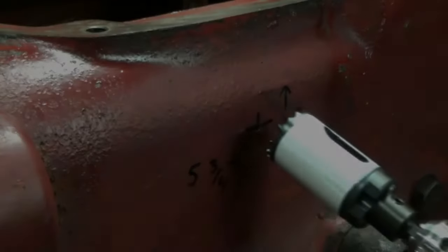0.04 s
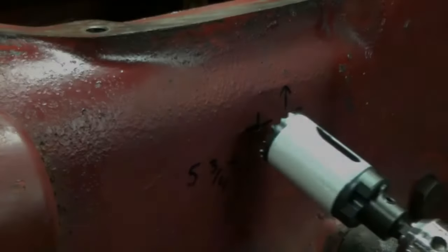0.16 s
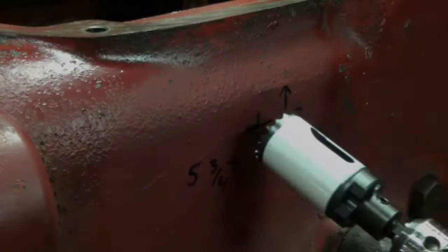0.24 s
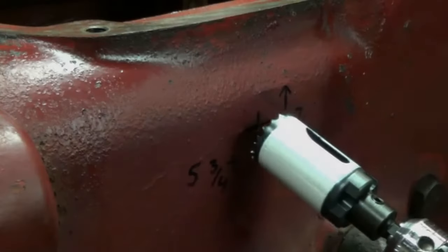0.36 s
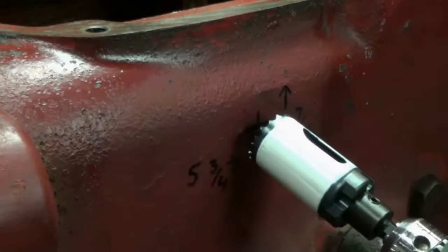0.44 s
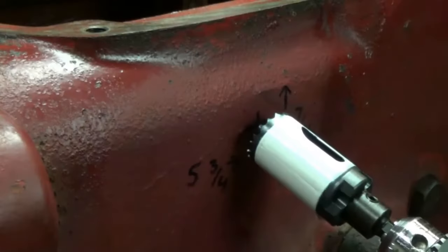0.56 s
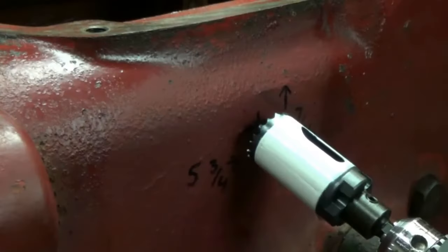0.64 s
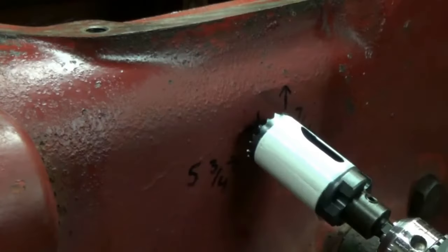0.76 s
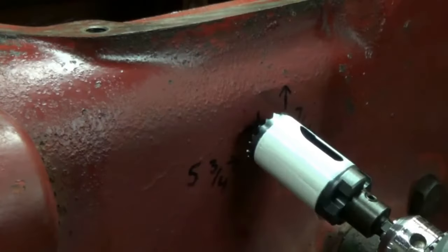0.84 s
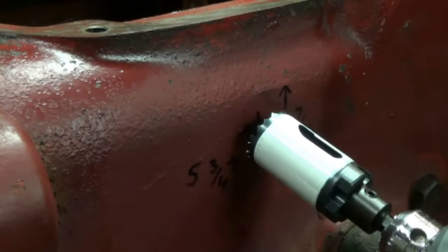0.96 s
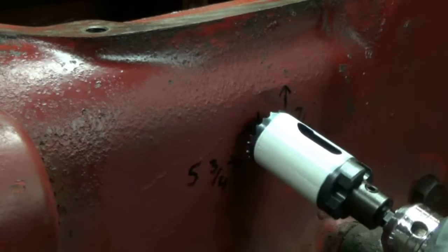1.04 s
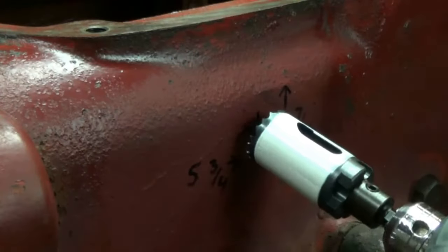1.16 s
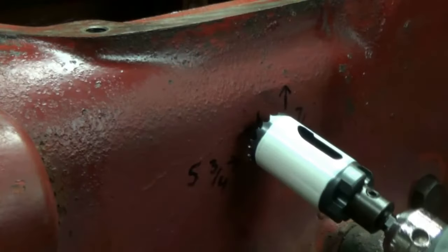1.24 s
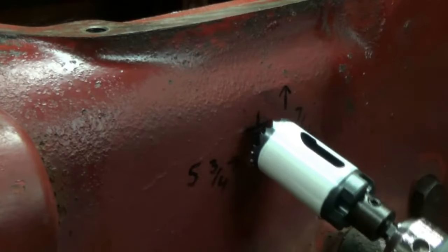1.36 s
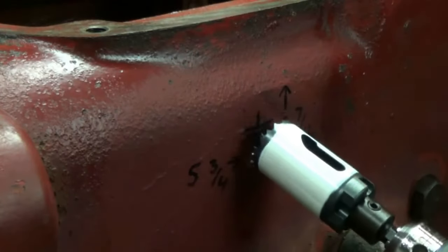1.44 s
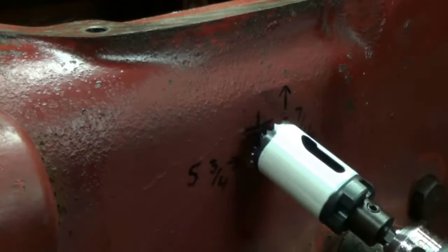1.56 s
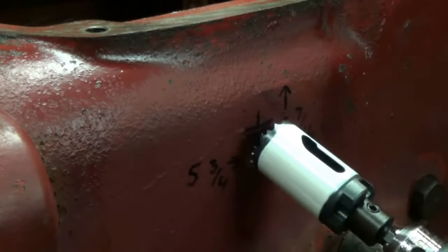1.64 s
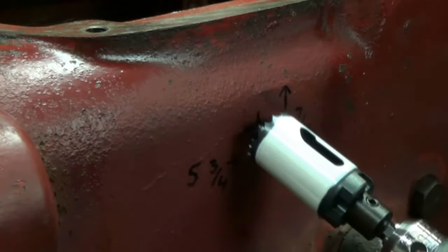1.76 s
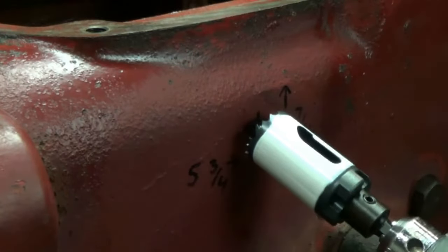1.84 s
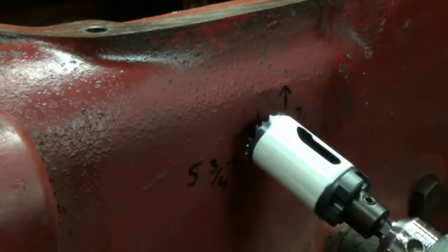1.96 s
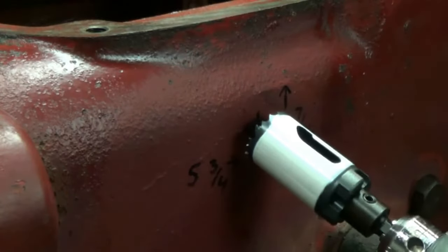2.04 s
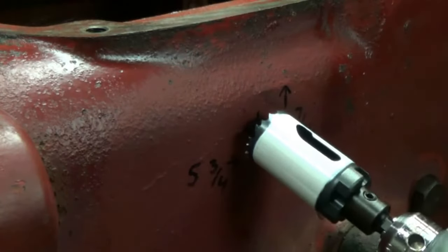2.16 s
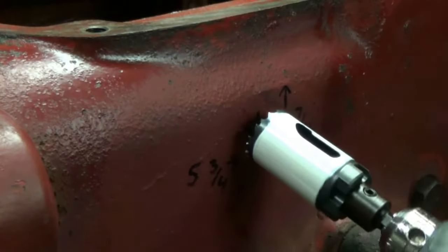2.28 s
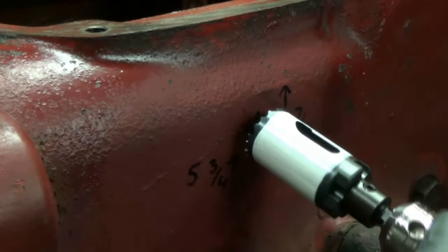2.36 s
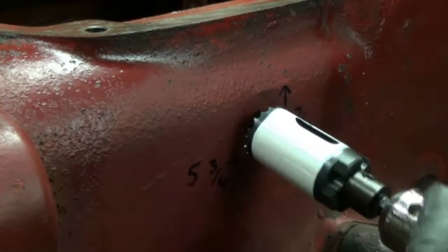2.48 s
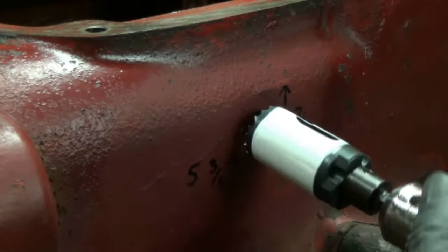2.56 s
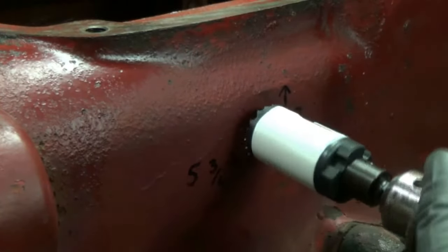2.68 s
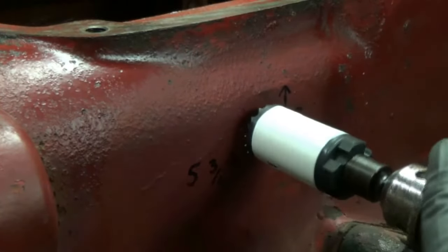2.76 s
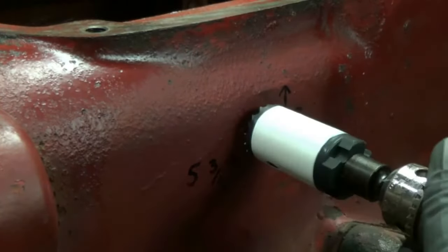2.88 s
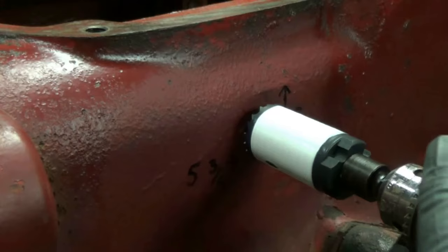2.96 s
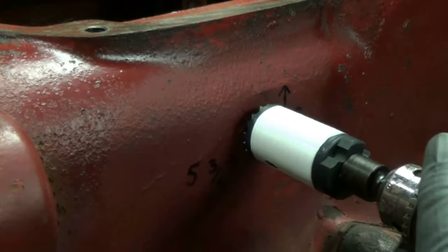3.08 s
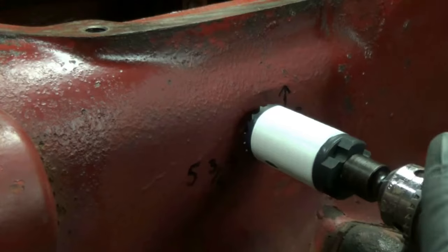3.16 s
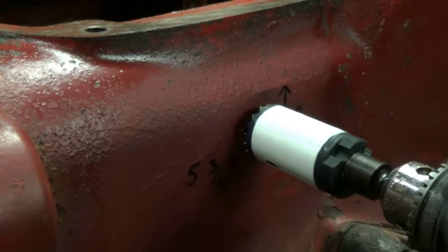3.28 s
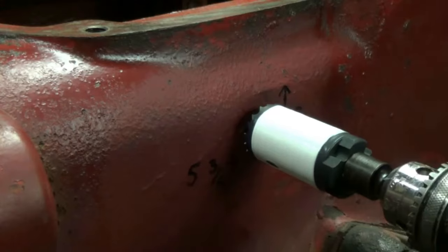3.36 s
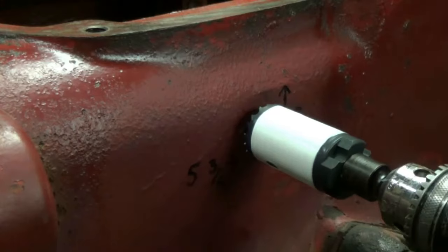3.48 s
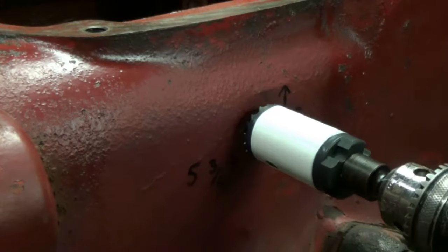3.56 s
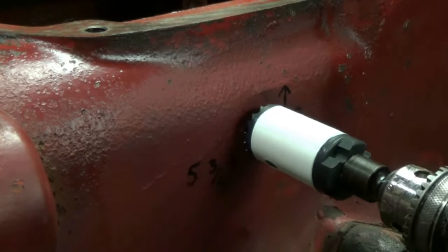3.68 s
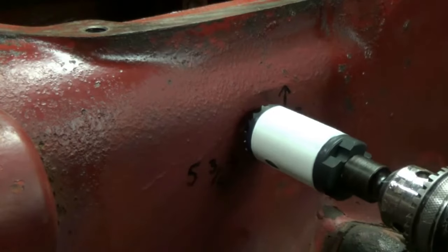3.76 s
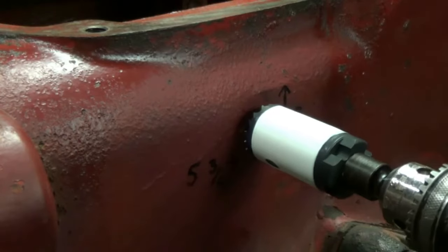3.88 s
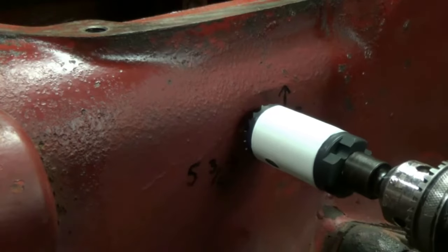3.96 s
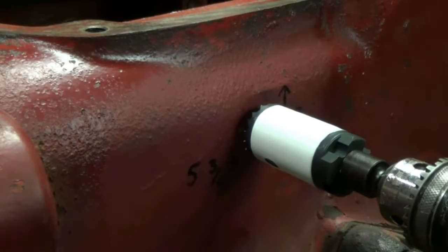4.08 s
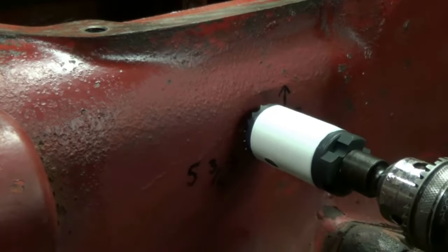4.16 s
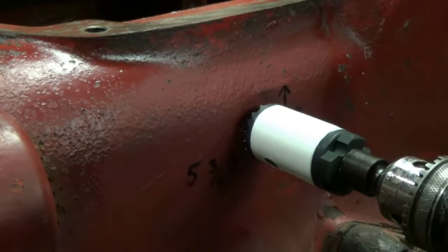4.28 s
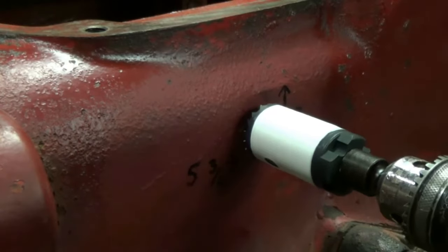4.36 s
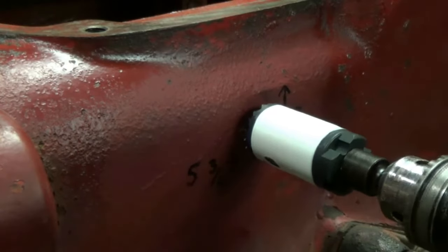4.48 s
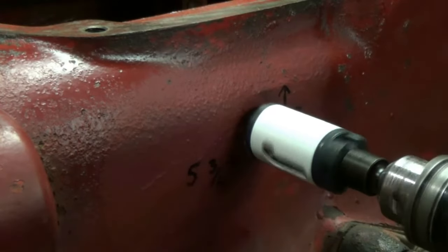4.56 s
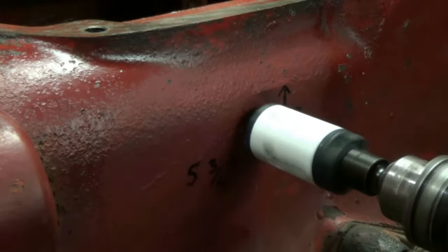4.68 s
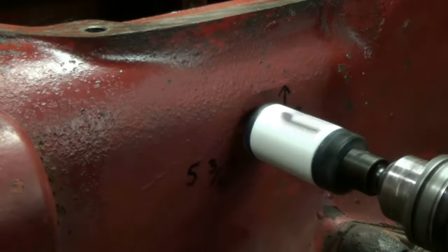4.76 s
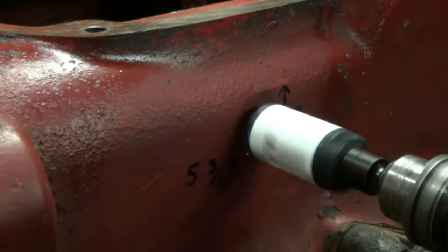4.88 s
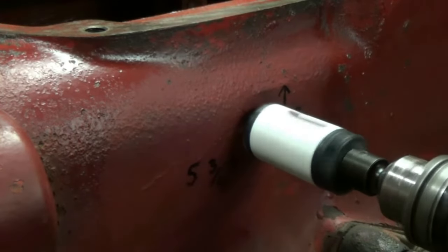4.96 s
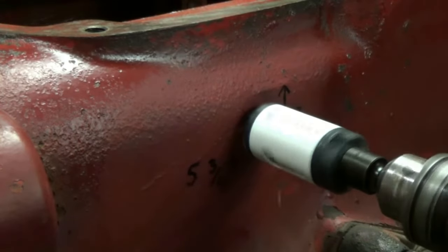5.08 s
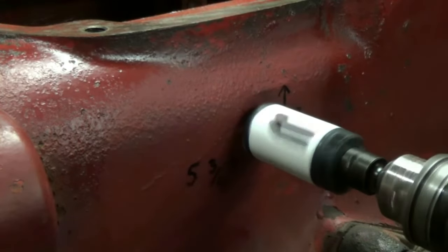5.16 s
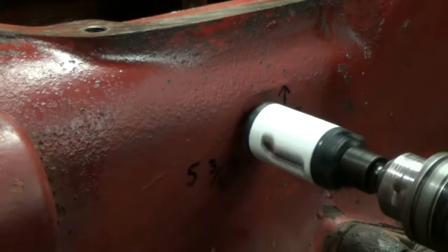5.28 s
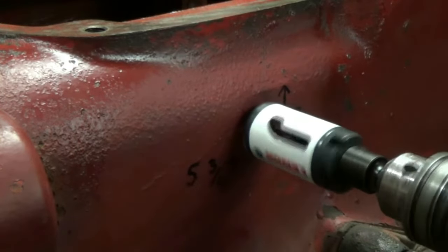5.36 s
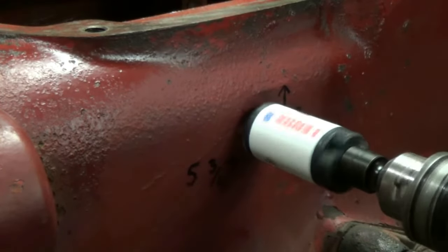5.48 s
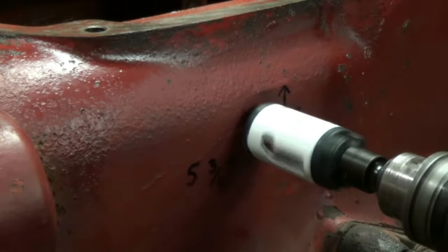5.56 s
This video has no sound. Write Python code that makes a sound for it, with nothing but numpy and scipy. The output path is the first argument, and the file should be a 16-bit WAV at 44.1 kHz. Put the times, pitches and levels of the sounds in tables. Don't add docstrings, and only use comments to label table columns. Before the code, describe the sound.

Close in a quiet workshop, a hole saw is fidgeted against a cast-iron housing: glove creaks, dry tooth rubs, a sharp knock, then chuck rattle. After four seconds the trigger clicks and the drill grinds loudly, iron ringing and steel squealing, before slowing into crackling snaps and biting again. A small camera microphone adds hiss and faint ticking.

```python
import sys
import numpy as np
from scipy import signal
from scipy.fft import rfft, irfft, next_fast_len
from scipy.io import wavfile
from scipy.ndimage import uniform_filter1d, map_coordinates

SR = 44100
rng = np.random.default_rng(int(sys.argv[2]) if len(sys.argv) > 2 else 0)


def makeup_ratio(level_db):
    decades = np.asarray(level_db, float) / 20
    return 10 ** decades


def pcm_store(signal):
    levels = np.round(np.clip(np.atleast_2d(signal), -1, 1) * 32767)
    wavfile.write(sys.argv[1], SR, levels.astype(np.int16).T)


N = 248283
T = np.arange(N) / SR


def unit(x):
    return x / np.sqrt(np.mean(x ** 2) + 1e-20)


def along(points, hz):
    f, v = np.transpose(points)
    return np.interp(np.log(hz + 1), np.log(f + 1), v)


def curves(rows):
    s, *columns = np.transpose(rows)
    return [np.interp(T, s, column) for column in columns]


def during(start, end):
    inside = 1. * (T > start) * (T <= end)
    return uniform_filter1d(inside, 221, mode="nearest")


def wobble(rate):
    return map_coordinates(rng.standard_normal(int(N * rate / SR) + 4), [T * rate])


def coloured(x, spectrum, peaks=()):
    hz = np.fft.rfftfreq(8192, 1 / SR)
    f = np.transpose(spectrum)[0]
    octaves_outside = np.abs(np.log2((hz + 1) / np.clip(hz + 1, f[0], f[-1])))
    db = along(spectrum, hz) - 30 * octaves_outside
    db = db + sum(lift / (1 + (2 * (hz - c) / w) ** 2) for c, w, lift in peaks)
    cepstrum = irfft(np.log(makeup_ratio(np.maximum(db, -120))))
    cepstrum = cepstrum * np.r_[1, 2 * np.ones(4095), 1, np.zeros(4095)]
    h = irfft(np.exp(rfft(cepstrum)))
    h = np.broadcast_to(h / np.linalg.norm(h), x.shape[:-1] + h.shape)
    return signal.fftconvolve(x, h, axes=-1)[..., :N]


def grains(rate, spread_db, alike, lean=((1, 0), (2, 0))):
    size = next_fast_len(N, True)
    pair = rfft(rng.standard_normal((2, N)) * makeup_ratio(spread_db * wobble(rate)), size)
    hz = np.fft.rfftfreq(size, 1 / SR)
    turn = np.arccos(np.clip(along(alike, hz), -1, 1)) / 2
    mid, side = pair[0] * np.cos(turn), pair[1] * np.sin(turn)
    tilt = makeup_ratio(along(lean, hz) / 2)
    left, right = (mid + side) * tilt, (mid - side) / tilt
    return unit(irfft(np.array([left, right]), size)[:, :N])


def patchy(x, depth_db, size=256):
    z = signal.stft(x, nperseg=size)[2]
    field = uniform_filter1d(rng.standard_normal(z.shape[1:]), 3, 0)
    field = uniform_filter1d(field, 4, 1)
    return signal.istft(z * makeup_ratio(depth_db * unit(field)), nperseg=size)[1][:, :N]


def bursts(s, db, t60):
    out, t = np.zeros(N + 4096), np.arange(4096) / SR
    for start, level, life in zip(s, db, t60):
        burst = makeup_ratio(-60 * t / max(life, .002)) * rng.standard_normal(len(t))
        out[round(start * SR):][:len(t)] += makeup_ratio(level) * burst / np.linalg.norm(burst)
    return out[:N]


def knocks(rows, sharp, noisy, size=2560):
    out, t = np.zeros(N + size), np.arange(size) / SR
    for s, db, hz, life in rows:
        push = noisy * makeup_ratio(-60 * t / max(life, .002)) * rng.standard_normal(len(t))
        push = push + rng.choice([-1, 1]) * (t == 0)
        band = signal.iirpeak(hz, sharp, SR)
        body = signal.lfilter(*band, signal.lfilter(*band, push))
        out[round(s * SR):][:len(t)] += makeup_ratio(db) * body / np.abs(body).max()
    return out[:N]


def knock_rows(s, db, hz, t60):
    return np.column_stack(np.broadcast_arrays(s, db, hz, t60))


# hz, level_db
HISS = [(12, -49), (20, -9), (92, 2.5), (206, -1.5), (258, -3.5), (462, -4), (1290, -8), (1800, -9),
        (2970, -12), (3230, -10), (3810, -14), (14100, -20.5), (15300, -18)]
# hz, likeness (0-1)
HISS_ALIKE = [(60, 1), (240, 0.912), (950, 0.053), (3770, 0.26), (15000, 0.99)]


def camera():
    frame_hz, scan_hz, supply_hz = 29.97, 15735, 11832
    hiss = makeup_ratio(-59) * unit(coloured(grains(3, .3, HISS_ALIKE), HISS))
    since = (T - .006) % (1 / frame_hz)
    tick = makeup_ratio(-57.5 + 1.5 * wobble(25) - 60 * since / .03) * np.sin(2 * np.pi * 3250 * since)
    gate = uniform_filter1d(1. * ((T - .015) * 13.2 % 1 < .8), 200)
    whine = makeup_ratio(-72) * gate * np.sin(2 * np.pi * scan_hz * T)
    supply = makeup_ratio(-87.5 + 3 * wobble(8)) * np.sin(2 * np.pi * supply_hz * T + 1.2 * wobble(30))
    return hiss + tick + whine + supply


# hz, level_db
THUD_COLOUR = [(200, -3), (500, -1), (900, 4), (1400, 2.5)]
TICK_COLOUR = [(5000, -3.5), (7500, -8), (11000, -5), (13000, -13), (15000, -35)]
# time_s, level_db
GRIP = [(0, -80), (.1, -66), (.4, -68), (.65, -66.5), (1.1, -76), (1.2, -70.5), (1.65, -64.5), (1.8, -70),
        (2.06, -65.5), (2.3, -68), (2.68, -63), (3.1, -64.5), (3.38, -57), (3.67, -54), (3.71, -61),
        (4.01, -61.5), (4.34, -64.5)]
# hz, level_db
GLOVE = [(88, -27), (150, -9.5), (334, 0), (708, -5.5), (954, -5.5), (1500, -14.5), (1950, -71),
         (3300, -120)]
RUB = [(650, -32), (1100, -5), (1320, -11.5), (1630, -1), (1950, -1.5), (4160, -6.5), (6500, -18.5),
       (8450, -22), (14300, -120)]
# middle_s, half_length_s, level_db, grit_db (re the stroke)
RUBS = [(0.106, 0.06, -67, -22), (0.347, 0.1, -63, -21), (0.623, 0.038, -58.5, -23),
        (0.785, 0.16, -59.5, -23), (1.156, .04, -68, -12), (1.312, 0.088, -59, -5.5),
        (1.625, 0.084, -57, -26), (1.88, .04, -51.5, -27), (2.048, 0.039, -65, -17), (2.36, 0.25, -63, -10),
        (2.712, 0.053, -63.5, 2.5), (2.831, 0.51, -62, -6), (3.152, 0.066, -70, -2),
        (3.264, 0.038, -69, 5.5), (3.369, 0.029, -60.5, 5.5), (3.458, 0.075, -51.5, -1),
        (3.646, 0.057, -43, -9.5), (3.787, 0.097, -62.5, -17), (3.952, 0.061, -57, -16),
        (4.14, 0.2, -61, -14.5), (4.335, 0.054, -81, -29)]
# start_s, end_s, level_db
DRAGS = [
    (1.238, 1.38, -57.5),
    (1.287, 1.368, -63),
    (2.64, 2.733, -59.5),
    (2.762, 2.769, -51),
    (3.622, 3.677, -49.5),
]
# hz, level_db
IRON = [(900, -22), (1400, -5), (2500, -2), (4000, -12), (6000, -17)]
# hz, width_hz, lift_db
BARE_MODES = [(1600, 75, 14), (2240, 100, 10), (3000, 350, 5), (5250, 550, 12)]


def hands():
    fade_db, rest_db, rest_grit_db = 11, -70, -81
    coarse = T[::100]
    swells = []
    for s, half, db, _ in RUBS:
        swell = makeup_ratio(db - fade_db * np.abs(coarse - s) / max(half, .01))
        swells.append(np.interp(T, coarse, swell))
    shed = makeup_ratio(rest_grit_db) + sum(makeup_ratio(row[-1]) * swell for row, swell in zip(RUBS, swells))
    near = [(300, 0.96), (10000, 0.72)]
    glove = makeup_ratio(curves(GRIP)[0] + 0.5 * wobble(14)) * unit(coloured(grains(150, 2, near), GLOVE))
    paint = unit(coloured(patchy(grains(250, 1, near), 2.5), RUB, [(2400, 900, 4)]))
    rub = (makeup_ratio(rest_db) + sum(swells)) * makeup_ratio(-1.0) * paint
    grit = shed * unit(coloured(grains(900, 1.8, near), TICK_COLOUR))
    stroke = sum(makeup_ratio(db) * during(start, end) for start, end, db in DRAGS)
    drag = stroke * unit(coloured(grains(150, 0.91, near), IRON, BARE_MODES))
    lifted = 1 - .8 * np.minimum(sum(during(start, end) for start, end, _ in DRAGS), 1)
    return (glove + lifted * rub + grit) * during(-1, 4.35) + drag


def contacts(rows, thud_db, tick_db, sharp):
    s, db, _, t60 = np.transpose(rows)
    thud = coloured(bursts(s, db + thud_db, t60), THUD_COLOUR)
    tick = coloured(bursts(s, db + tick_db, 0.72 * t60), TICK_COLOUR)
    return knocks(rows, sharp=sharp, noisy=0.25) + thud + tick


# time_s, peak_db, pitch_hz, t60_s
TAPS = [(0.5419, -37.5, 1740, 0.023), (0.5425, -55, 3080, .012), (0.5445, -48.5, 418, 0.018),
        (1.8542, -33, 5260, 0.011), (1.8563, -39, 340, 0.026), (1.8565, -30.5, 7360, 0.019),
        (1.857, -31.5, 910, 0.025), (2.5058, -38, 7100, .012), (2.5124, -35, 6000, .015),
        (1.4247, -44.5, 1870, 0.015), (1.8539, -20, 3400, 0.028), (1.8561, -23, 1760, 0.025),
        (1.9008, -35.5, 1800, 0.02), (1.901, -39, 3800, .015), (1.9088, -43, 3540, 0.042),
        (2.4966, -34.5, 1600, .014), (2.5055, -31.5, 1540, 0.012), (2.5056, -29, 3450, 0.014),
        (2.5122, -28, 2860, 0.033), (2.5135, -33, 1180, 0.015), (2.5247, -32.5, 2080, .018),
        (2.5326, -36, 1300, 0.01), (2.5372, -39, 1300, 0.013), (2.6758, -41, 1640, 0.035)]


def taps():
    return contacts(TAPS, 1, -15, sharp=1.42)


# hz, t60_s
SHOP = [(200, 0.37), (2000, 0.086), (10000, 0.14)]


def shop(x):
    hz, t, z = signal.stft(rng.standard_normal((2, SR // 2)), SR, nperseg=256)
    tail = signal.istft(z * makeup_ratio(-60 * t / along(SHOP, hz)[:, None]), SR, nperseg=256)[1]
    delayed = np.pad(x, (300, 0))[None]
    return signal.fftconvolve(delayed, tail / np.linalg.norm(tail[0]), axes=1)[:, :N]


# hz, level_db, t60_s
STEEL = [(3133, -9, .1), (3600, -18, .8), (3844, -14, 1.1), (7553, -17, .45), (8893, -9, .25),
         (10150, -14, .07), (11210, -16, .3)]


def clink():
    start_s, level_db = 1.8545, -45.5
    t = np.maximum(T - start_s, 0)
    return makeup_ratio(level_db) * sum(makeup_ratio(db - 60 * t / life) * np.sin(2 * np.pi * hz * t) for hz, db, life in STEEL)


# time_s,
# peak_db, pitch_hz
CREAKS = [(2.137, -43.5, 327), (2.658, -48, 285), (2.677, -46, 310), (3.327, -43, 689), (3.359, -45, 750),
          (3.501, -40, 850), (3.517, -50, 800), (3.533, -41, 1000), (3.549, -53, 804), (3.566, -39.5, 750),
          (3.809, -47, 705), (3.82, -33, 810), (3.822, -43, 400), (3.836, -42, 420), (3.842, -44, 1350),
          (3.832, -36.5, 815), (3.843, -37.5, 870), (3.855, -44, 408), (3.87, -40, 940), (3.946, -45, 800),
          (3.96, -45, 328), (4.003, -45, 750)]


def creaks():
    return knocks([(s, db, hz, 0.034) for s, db, hz in CREAKS], sharp=1.3, noisy=.1)


# time_s, peak_db, pitch_hz
RATTLE = [(3.353, -44, 4200), (3.4759, -41, 4500), (3.4905, -43, 5000), (3.511, -42.5, 3800),
          (3.5768, -48, 4800), (3.5817, -40, 5200), (3.586, -44, 5600), (3.605, -40, 3240),
          (3.6149, -34.5, 3080), (3.629, -36, 2920), (3.633, -36, 3050), (3.6501, -28, 3000),
          (3.655, -34.5, 1990), (3.6637, -34.5, 3160), (3.6705, -31, 3000), (3.6771, -30.5, 2290),
          (3.685, -48, 2090)]
# hz, level_db (re the knock)
CLATTER = [(6000, -8.5), (9100, -11), (11100, -15)]


def rattle():
    t60_s, low_share, low_db = 0.017, .6, -4
    main = contacts([(s, db, hz, t60_s) for s, db, hz in RATTLE], -10, -12, sharp=5)
    low = knocks([(s, db + low_db, low_share * hz, t60_s) for s, db, hz in RATTLE], sharp=4, noisy=.1)
    bright = sum(knocks([(s, db + lift, hz, t60_s) for s, db, _ in RATTLE], sharp=6.1, noisy=.15)
                 for hz, lift in CLATTER)
    return main + low + bright


def ratchet(count=6):
    start_s, gap_s, level_db, pitch_hz = 3.385, .0162, -40.5, 800
    s = start_s + gap_s * np.arange(count)
    return knocks(knock_rows(s, level_db, pitch_hz, .012), sharp=1.1, noisy=.06)


# start_s, length_s, pitch_hz, sag_hz_per_s, level_db
SQUEAKS = [
    (4.008, .022, 11650, -18000, -66),
    (4.028, .045, 12000, 19998, -67),
    (4.185, 0.035, 9550, 6000, -68),
    (4.24, 0.043, 8900, 4998, -69),
]


def squeaks():
    out = 0
    for s, length, hz, sag, db in SQUEAKS:
        t = T - s
        out = out + makeup_ratio(db) * during(s, s + length) * np.sin(2 * np.pi * (hz - sag * t / 2) * t)
    return out


# time_s, peak_db, pitch_hz, t60_s
TRIGGER = [(4.342, -28, 4400, .02), (4.3485, -38, 1310, .03), (4.3488, -29, 7500, 0.02),
           (4.4028, -35, 2300, .015), (4.48, -21.5, 910, 0.027), (4.3416, -28.5, 2560, 0.056),
           (4.3478, -23.5, 4340, 0.018), (4.349, -31, 2480, 0.034), (4.3827, -34, 1810, 0.023),
           (4.4026, -29.5, 3770, 0.01), (4.4183, -31, 2800, 0.022), (4.432, -40, 3000, .02),
           (4.4495, -34, 2230, 0.037), (4.4792, -12.5, 1720, 0.026), (4.4794, -16, 2500, 0.035),
           (4.4795, -21, 5230, 0.036), (4.4965, -28, 1090, 0.022), (4.5115, -27, 1210, 0.033)]


def trigger():
    return contacts(TRIGGER, 1, -22, sharp=1.67) * makeup_ratio([[-.8], [.8]])


def jolts():
    jolt_db, jolt_s = 9, .002
    s, db, *_ = np.transpose(CHIPS)
    kicks = np.bincount(np.round(s * SR).astype(int), makeup_ratio(db + jolt_db), N)
    return signal.lfilter([1], [1, -np.exp(-1 / (jolt_s * SR))], kicks)


FULL_HZ = 183
# time_s, speed_hz
SPEED = [
    (4.5, 30.2),
    (4.565, 101.5),
    (4.728, 167.5),
    (4.788, 182.5),
    (4.9, 182.7),
    (4.986, 164.4),
    (5.16, 139),
    (5.5, 94),
    (5.63, 63),
]
# time_s, level_db
CUT = [(4.52, -35.5), (4.533, -24), (4.55, -25.5), (4.585, -18.5), (4.61, -18.5), (4.78, -19),
       (5.14, -19.5), (5.236, -24.5), (5.45, -26), (5.5, -26.5), (5.55, -23), (5.575, -19.5), (5.63, -20)]
# time_s, share (0-1)
JERK = [
    (4.36, .5),
    (4.57, .6),
    (4.6, .35),
    (4.65, 0),
    (5.63, 0),
]
# hz, level_db
GRIND = [(420, -47), (720, -9.5), (1450, -3.5), (1620, -7), (1890, -4), (2210, -3.5), (2590, -3.5),
         (3080, -6), (3350, -6.5), (4540, -9.5), (6500, -24.5), (8450, -36), (14300, -120)]
GRIT = [(3530, -2.5), (6000, -4), (6420, -6.5), (9390, -4.5), (9860, -2.5), (11200, -1.5), (11900, -2.5),
        (13300, -10.5), (15600, -3.5)]
RUMBLE = [(35, -76), (60, -14), (112, -21.5), (315, 0.5), (504, -1.5), (600, 0.5), (780, -25), (1320, -120)]
BOOM = [(520, -22.5), (605, -4), (645, 4), (700, -5), (1000, -27)]
# hz, width_hz, lift_db
CASTING = [(950, 40, 3), (1630, 190, 6.5), (2235, 90, 3), (2790, 60, 2), (3130, 40, 4), (3835, 70, 3),
           (7560, 30, 4), (8510, 25, 5), (8890, 36, 4)]
SINGING = [(1612, 55, 25), (3130, 26, 22), (7560, 25, 18), (8510, 16, 26)]
# hz, likeness (0-1); then hz, left_minus_right_db
ALIKE = [(60, 0.37), (180, 0.9), (550, 0.86), (1650, 0.77), (4970, 0.67), (15000, 1)]
LEAN = [(60, 3), (180, -2.5), (550, -2.5), (1650, -2.5), (4970, -4.5), (15000, 1)]


def drill():
    creep_s, catch_s, spun_s, mains_hz = 4.355, 4.482, 4.58, 60
    slow = 1 - np.minimum(curves(SPEED)[0] / FULL_HZ, 1)
    kick = np.exp(-2.5 * ((T - 4.5277) * mains_hz % 1))
    force = makeup_ratio(-47.5) * during(creep_s, catch_s) + makeup_ratio(curves(CUT)[0]) * during(catch_s, 6)
    torque = 1 + curves(JERK)[0] * (unit(kick) - 1) + jolts()
    grind = unit(coloured(patchy(grains(2400, 2.6, ALIKE, LEAN), 1.6, size=1024), GRIND, CASTING))
    grit_db = -4 - 12 * slow + 0.34 * wobble(45)
    grit = unit(coloured(grains(1400, 0.94, ALIKE, LEAN), GRIT, CASTING)) * makeup_ratio(grit_db)
    strain = np.clip((spun_s - T) / (spun_s - CUT[0][0]), 0, 1)
    coasting = during(5.13, 5.5)
    rumble_db = -15.5 - 7 * slow + 11 * strain - 6 * coasting
    rumble = unit(coloured(grains(60, 1.4, ALIKE, LEAN), RUMBLE)) * makeup_ratio(rumble_db)
    boom_db = -17.5 + 6 * slow + 3 * (T < catch_s)
    boom = unit(coloured(grains(40, .5, ALIKE, LEAN), BOOM)) * makeup_ratio(boom_db)
    thin = [(500, -6.0), (3000, -1.0), (9000, -24.0)]
    sing = unit(coloured(grains(30, 0.62, ALIKE, LEAN), thin, SINGING)) * makeup_ratio(-13.5)
    return force * (torque * (grind + grit) + boom + rumble + sing)


# start_s, end_s, pitch_hz, level_db
HOWLS = [(4.362, 4.373, 600, -52), (4.379, 4.393, 600, -49), (4.414, 4.425, 620, -54),
         (4.446, 4.458, 620, -53), (4.592, 4.65, 650, -31), (4.695, 4.725, 620, -33),
         (4.695, 4.78, 1620, -24), (4.78, 4.87, 1670, -29.5), (4.88, 4.98, 1580, -31),
         (4.86, 4.94, 2260, -33), (5.05, 5.11, 2200, -32), (5.2, 5.55, 640, -44), (5.33, 5.42, 1630, -36),
         (5.44, 5.5, 1640, -37), (5.45, 5.505, 225, -50), (5.555, 5.605, 200, -51), (5.565, 5.6, 340, -47),
         (5.6, 5.636, 440, -46), (4.793, 4.815, 2200, -25), (4.83, 4.865, 3130, -31),
         (4.985, 5.015, 3130, -29), (5.09, 5.125, 1610, -28), (5.148, 5.175, 2235, -26),
         (5.175, 5.2, 1630, -29), (5.568, 5.6, 640, -29), (5.568, 5.59, 760, -32),
         (5.568, 5.636, 1570, -24)]


def howls():
    flutter, drift = makeup_ratio(1.5 * wobble(70)), wobble(90)
    ring = 0
    for start, end, hz, db in HOWLS:
        phase = 2 * np.pi * hz * T + min(hz / 900, 1.8) * np.roll(drift, hz)
        ring = ring + makeup_ratio(db) * np.roll(flutter, hz) * during(start, end) * np.sin(phase)
    return np.sqrt(2) * ring * makeup_ratio([[-1.2], [1.2]])


# time_s, peak_db, pitch_hz, t60_s
BITES = [
    (4.5279, -21, 910, 0.028),
    (4.5445, -20, 950, .03),
    (4.5605, -15.5, 940, 0.033),
    (4.5778, -21, 1550, .02),
    (4.5438, -14, 2050, 0.02),
    (4.5603, -19, 2220, 0.021),
    (5.5277, -14.5, 1880, 0.026),
    (5.5457, -14, 2770, 0.041),
    (5.5651, -19, 2420, .03),
    (5.578, -19, 1480, 0.049),
]


def bites():
    return knocks(BITES, sharp=1.9, noisy=0.27)


def armature():
    first_db, second_db, third_db = -47.5, -41, -49
    first_fall_db, second_fall_db = 46, 52
    hz, = curves(SPEED)
    slow, turn = 1 - hz / FULL_HZ, 2 * np.pi * np.cumsum(hz) / SR
    first = makeup_ratio(first_db - first_fall_db * slow) * np.sin(turn)
    second = makeup_ratio(second_db - second_fall_db * slow + 0.99 * wobble(12)) * np.sin(2 * turn + 1.4 * wobble(25))
    third = makeup_ratio(third_db - second_fall_db * slow) * np.sin(3 * turn + wobble(25))
    return np.sqrt(2) * (first + second + third) * during(4.565, 5.15) * makeup_ratio([[-1.5], [1.5]])


# start_s, end_s, mode_hz, level_db
SQUEAL = [(4.631, 4.66, 10200, -25), (4.62, 4.652, 11300, -25), (4.67, 4.7, 11215, -28),
          (4.885, 4.907, 10160, -29), (4.887, 4.91, 11300, -24.5), (4.971, 4.988, 10145, -26),
          (5.013, 5.036, 11240, -22), (5.05, 5.104, 11100, -30), (5.058, 5.098, 7546, -35),
          (5.1, 5.128, 11260, -30), (5.137, 5.152, 10145, -26), (5.155, 5.198, 10145, -24.5),
          (5.222, 5.227, 11215, -26), (5.243, 5.296, 10930, -30), (5.247, 5.258, 11215, -33),
          (5.273, 5.298, 11250, -28), (5.243, 5.256, 10145, -26), (5.272, 5.297, 10145, -26),
          (5.32, 5.348, 11470, -32), (5.394, 5.423, 11300, -39), (5.425, 5.487, 7558, -48)]


def squeal():
    cup_hz = np.array([7558, 10145, 11062, 11215])
    drift, ring = 1.2 * wobble(60), 0
    for start, end, hz, db in SQUEAL:
        mode = cup_hz[np.abs(cup_hz - hz).argmin()]
        ring = ring + makeup_ratio(db) * during(start, end) * np.sin(2 * np.pi * mode * T + drift)
    whine = sum(makeup_ratio(-43 + 4 * wobble(45)) * np.sin(2 * np.pi * hz * T + 1.5 * wobble(40)) for hz in cup_hz[1:])
    flutter = makeup_ratio(3 * wobble(220))
    return flutter * ring + whine * during(4.6, 5.44)


# time_s, knock_db, high_snap_db, low_snap_db
CHIPS = [(5.0558, -14, -17, -22), (5.1266, -10, -14, -18), (5.1486, -14, -17, -22), (5.1555, -11, -14, -19),
         (5.1743, -14.5, -14, -20), (5.1989, -13, -13, -14), (5.2068, -16, -10, -16),
         (5.2137, -16, -12, -14), (5.2185, -15, -12, -13), (5.2274, -14, -11, -17), (5.2365, -16, -10, -16),
         (5.2422, -16, -12, -21), (5.2586, -15, -11, -22), (5.2693, -14, -10, -21), (5.297, -14, -11, -19),
         (5.3003, -13, -16, -19), (5.3154, -11.5, -16, -21), (5.3422, -12, -13, -21),
         (5.3549, -13, -11, -18), (5.3741, -12.5, -12, -18), (5.3949, -12, -11, -17),
         (5.403, -14, -13, -14), (5.4203, -12, -11, -13), (5.4431, -9.5, -16, -19),
         (5.4555, -13.5, -30, -32), (5.4835, -17, -27, -27)]
# hz, level_db, t60_s
PINGS = [(7553, -9, .4), (8510, -7, .3), (10145, 3, .08), (11215, -2, .1)]


def chips():
    s, db, high_db, low_db = np.transpose(CHIPS)
    levels = np.array([high_db, low_db, high_db - 11]) - 3.5 + .7 * rng.standard_normal(len(s))
    snap = sum(knocks(knock_rows(s, level, hz, .005), sharp=8, noisy=.6)
               for hz, level in zip((10800, 8400, 13200), levels))
    knock = knocks(knock_rows(s, db - 3.5, 3600, .009), sharp=1.3, noisy=.2)
    ring = knocks(knock_rows(s + .002, db - 21, 645, .06), sharp=4, noisy=.1)
    t = np.arange(SR // 2) / SR
    ping = sum(makeup_ratio(level - 60 * t / life) * np.sin(2 * np.pi * hz * t) for hz, level, life in PINGS)
    blows = np.bincount(np.round(s * SR).astype(int), makeup_ratio(low_db - 27), N)
    ping = signal.fftconvolve(blows, ping)[:N]
    return snap + ping + (knock + ring) * makeup_ratio([[-1.3], [1.3]])


def bench():
    bump = knocks([(5.14, -42, 85, -1.5)], sharp=3.1, noisy=0.062, size=8192)
    return np.array([bump, np.roll(bump, 120)])


def scene():
    hits = (taps() + rattle() + trigger() + clink()) * makeup_ratio([[-1.8], [1.8]])
    hits = hits + (creaks() + ratchet()) * makeup_ratio([[-.6], [.6]])
    hits = hits + chips() + bites() * makeup_ratio([[-1.3], [1.3]])
    air = hands() + hits + makeup_ratio(-11.0) * shop(hits.mean(0)) + squeaks()
    air = air + drill() + howls() + armature() + squeal() + bench()
    return signal.sosfilt(signal.butter(4, 13300, fs=SR, output="sos"), air) + camera()


def roll_off(x):
    return signal.sosfilt(signal.butter(12, 15770, fs=SR, output="sos"), x)


def record(dry):
    soft = dry / (1 + np.abs(dry / .85) ** 4) ** (1 / 4)
    hz, _, z = signal.stft(soft, SR, nperseg=2048)
    loud = np.abs(z).max(axis=(0, 1)) > makeup_ratio(-56)
    top_hz = rng.choice([13400, 14000, 14500, 15100, 15100, 15500], len(loud))
    edge_hz = np.where(loud, top_hz, SR)
    kept = signal.istft(z * (hz[:, None] < edge_hz), SR, nperseg=2048)[1][:, :N]
    return roll_off(kept)


dry = scene()
out = record(dry)
pcm_store(out)
```